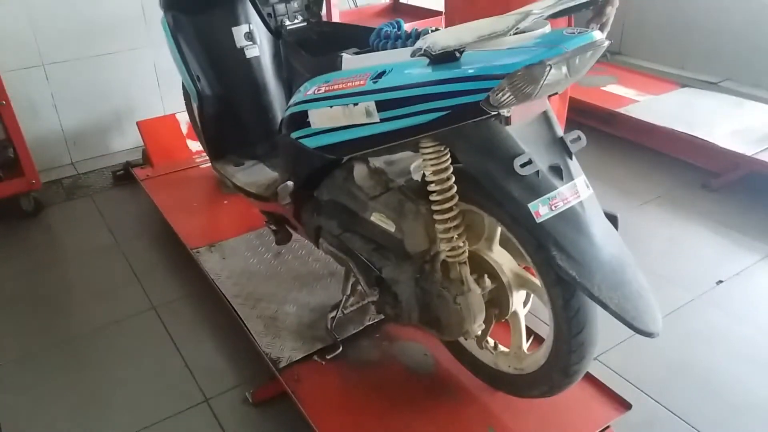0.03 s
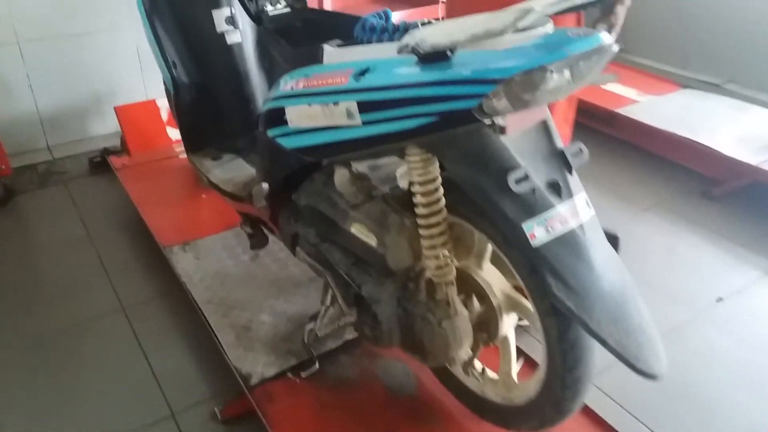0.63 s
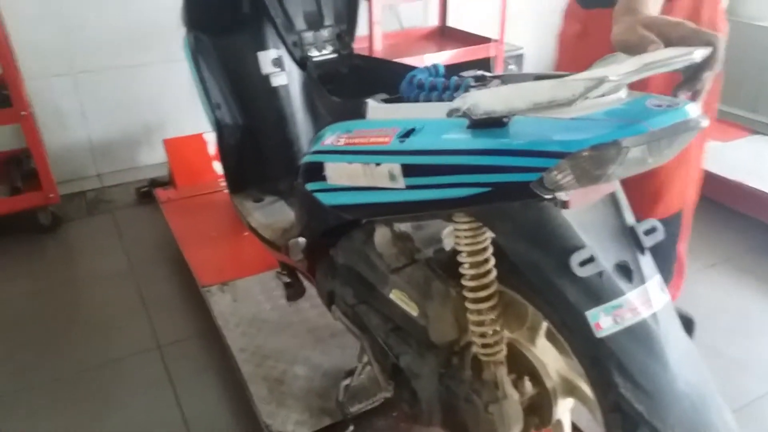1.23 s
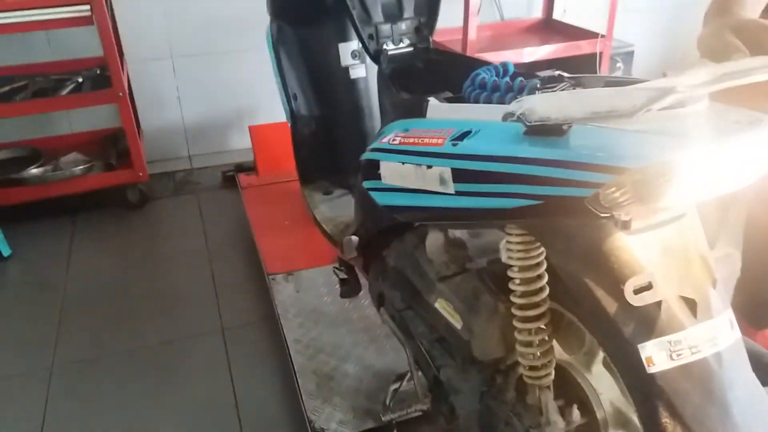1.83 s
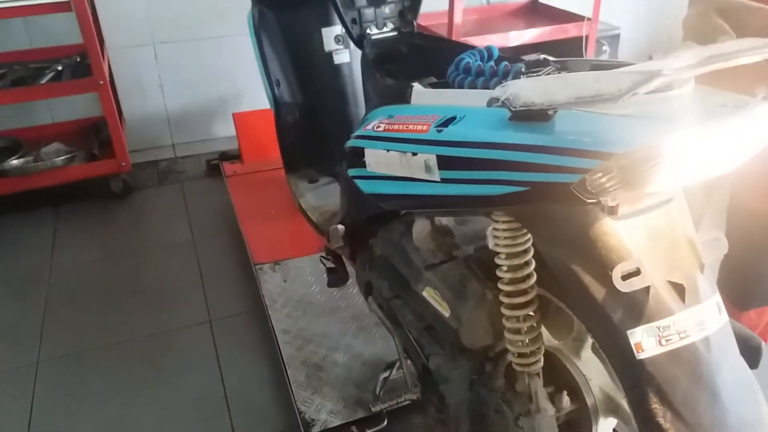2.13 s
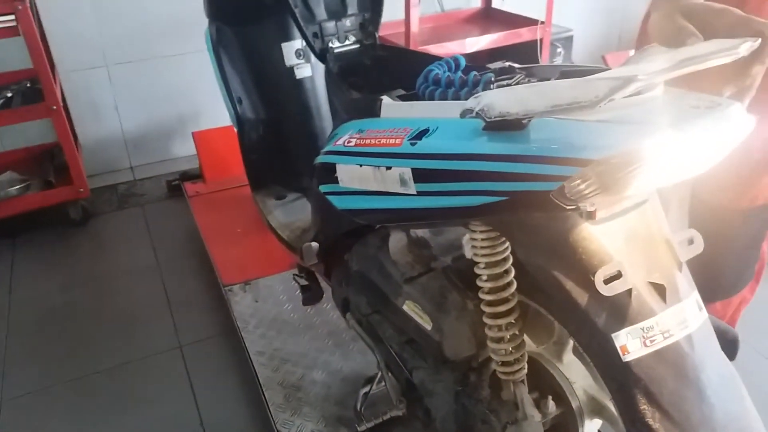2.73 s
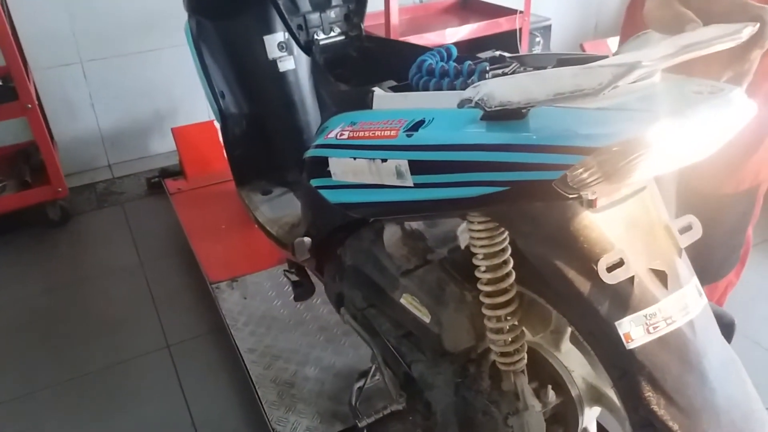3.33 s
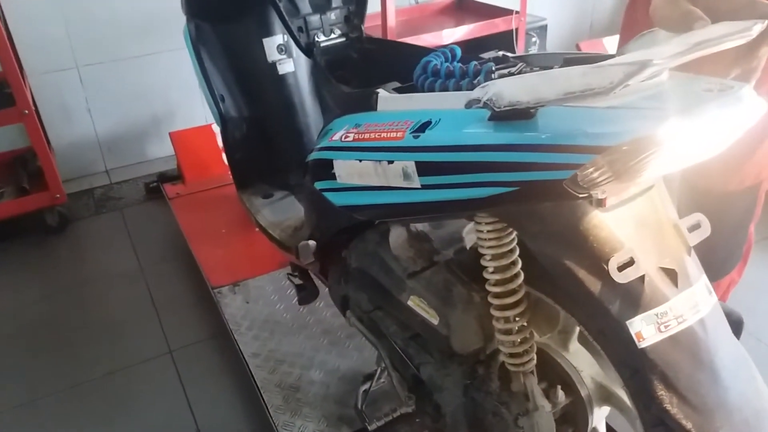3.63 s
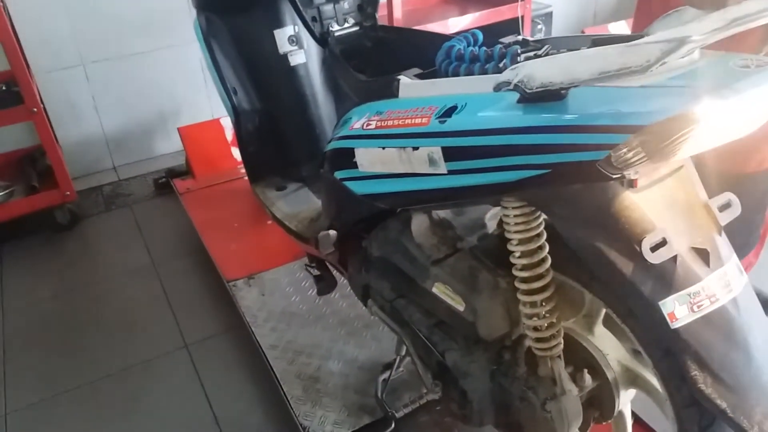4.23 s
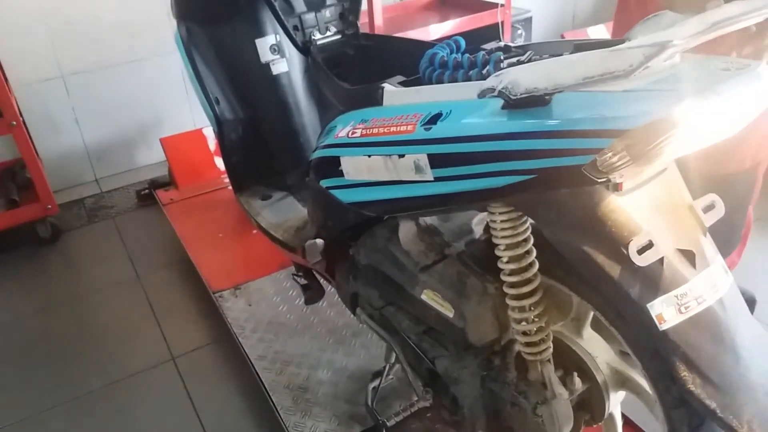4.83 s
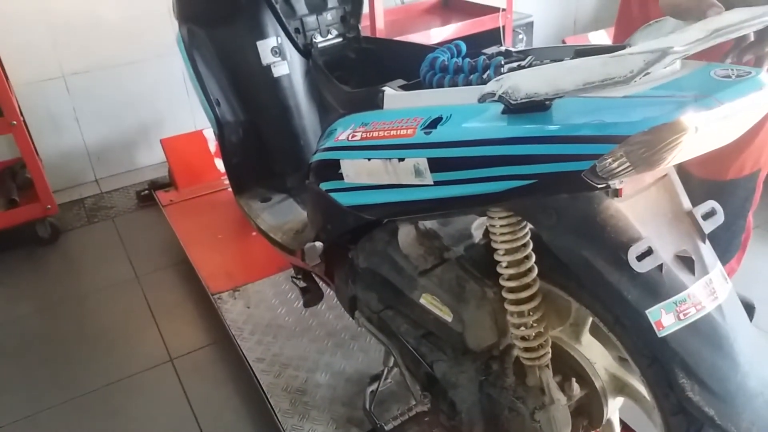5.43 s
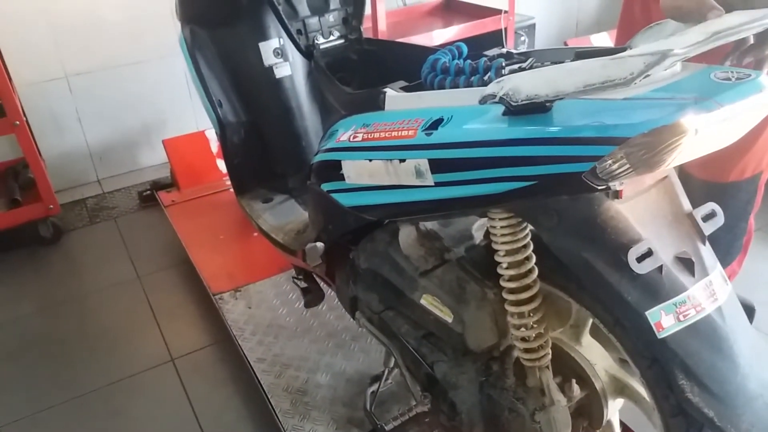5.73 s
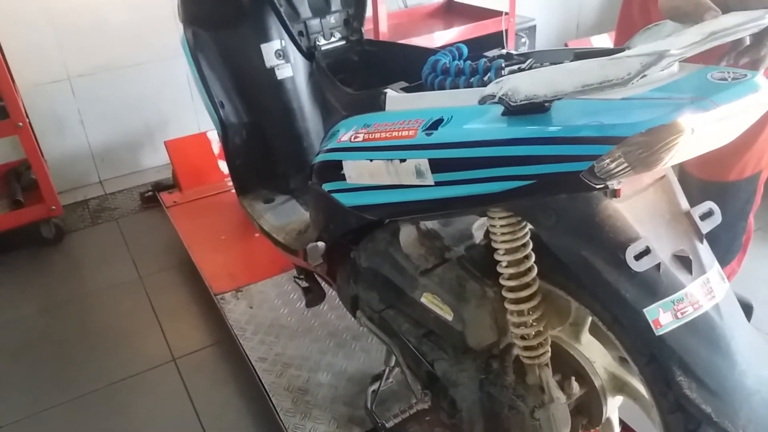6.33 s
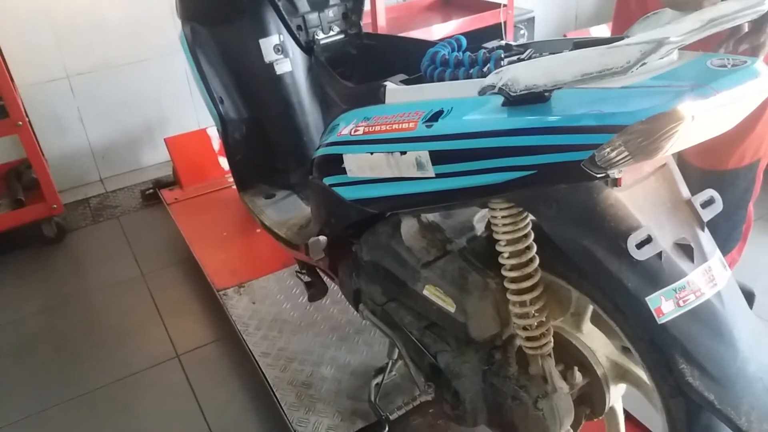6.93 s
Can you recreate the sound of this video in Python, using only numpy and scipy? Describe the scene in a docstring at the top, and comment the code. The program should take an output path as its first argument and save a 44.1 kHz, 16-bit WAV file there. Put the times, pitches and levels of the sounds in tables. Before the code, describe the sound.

For the first four seconds a tiled workshop is quiet, with a low rumble and fading hiss. Light rustles and small clicks on hollow bodywork come between 0.3 and 1.8 seconds, with a soft bump at 1.5 and a distant scrape at 2.5. Very faint, thin wavering tones follow until about 4. At 4 seconds an electric starter whines and whirrs for half a second, with several metallic clanks. The single-cylinder scooter engine catches at about 4.2, close by and much louder than the room, its slow hollow putts quickening until 5.7. It then settles to a pulsing idle with rushing exhaust, valve ticks and drive rattle. At 6.8 the throttle opens: an intake growl rises into a loud, buzzing rasp, with two sharp cracks just after 7 seconds as the sound ends. The walls add short echoes and a diffuse tail.

```python
"""A single-cylinder scooter engine starts, idles with a hollow putter and is revved to a loud rasp.
Each firing rings the silencer; gas rush, valve ticks and drive rattle follow the crank.
First come room tone, quiet handling clicks and the electric starter's gear whine and brush whirr.
Metallic clanks sound while the starter cranks, and two sharp cracks during the rev.
The tiled workshop adds wall echoes and a diffuse tail."""
import sys
import numpy as np
from scipy import signal
from scipy.fft import rfft, irfft, next_fast_len
from scipy.io import wavfile

SR = 44100
rng = np.random.default_rng(int(sys.argv[2]) if len(sys.argv) > 2 else 0)


def wav_out(sig):
    """Save sig, one row per channel (or a flat mono array), as 16-bit PCM at SR to the path in sys.argv[1]."""
    wavfile.write(sys.argv[1], SR, np.round(np.clip(np.atleast_2d(sig).T, -1, 1) * 32767).astype(np.int16))


N = 316638
TIME = np.arange(N) / SR

# Engine speed. Each row: time in seconds, firings per second.
FIRING_RATE = [(4.17, 4.78), (4.42, 6.55), (4.7, 9.39), (4.8, 10.08), (5.02, 13.65), (5.35, 16.91),
               (5.65, 18.13), (5.95, 15.25), (6.15, 14.02), (6.45, 13.53), (6.78, 13.88), (6.95, 22.35),
               (7.18, 33.45)]
CATCH_S = FIRING_RATE[0][0]


def from_db(db):
    """Decibels to gain."""
    return 10 ** (np.asarray(db) / 20)


def unit_rms(x):
    """Scale to rms 1."""
    return x / np.sqrt(np.mean(x ** 2) + 1e-20)


def curve(rows):
    """Interpolate (seconds, value) rows at every sample."""
    return np.interp(TIME, *np.transpose(rows))


def drift(rate_hz):
    """Straight lines between unit normal draws."""
    knots = rng.standard_normal(4000)
    return np.interp(TIME * rate_hz, np.arange(len(knots)), knots)


def swell(start_s, attack_s, hold_s, fade_db_per_s):
    """Envelope: linear rise, hold, exponential fade (growth if negative)."""
    age_s = TIME - start_s
    fade_db = fade_db_per_s * np.maximum(age_s - attack_s - hold_s, 0)
    return np.clip(age_s / attack_s, 0, 1) * from_db(-fade_db)


def band(x, low_hz, high_hz, order=2):
    """Causal band-pass."""
    edges_hz = np.clip([low_hz, max(high_hz, low_hz * 1.1)], 10, [.4 * SR, .45 * SR])
    return signal.sosfilt(signal.butter(order, edges_hz, "band", fs=SR, output="sos"), x + 1e-18)


def noise(spectrum, envelope=1):
    """Modulated white noise shaped by (Hz, dB) rows, rolled off beyond them; rms 1."""
    hz, db = np.transpose(spectrum)
    size = next_fast_len(N)
    log_hz = np.log(np.maximum(np.fft.rfftfreq(size, 1 / SR), 1))
    outside = np.maximum(np.log(hz[0]) - log_hz, 0) + np.maximum(log_hz - np.log(hz[-1]), 0)
    gain = from_db(np.interp(log_hz, np.log(hz), db) - 47 * outside)
    white = rng.standard_normal(N) * envelope
    return unit_rms(irfft(rfft(white, size) * gain, size)[:N])


def strikes(rows):
    """One band-limited noise burst per row."""
    out = np.zeros(N + SR)
    for start_s, db, low_hz, high_hz, length_s in rows:
        age = TIME[:SR // 4] / max(length_s, .001)
        burst = rng.standard_normal(len(age)) * np.sqrt(2 * np.e * age) * np.exp(-age ** 1.25)
        hit = band(burst, low_hz, high_hz, order=3) * np.sqrt(SR / 2 / abs(high_hz - low_hz))
        at = round(start_s * SR)
        out[at:at + len(hit)] += from_db(db) * hit
    return out[:N]


def ring(x, modes):
    """Drive damped modes with x and sum them."""
    out = np.zeros(N)
    for hz, db, t60_s in modes:
        r, w = from_db(-60 / (t60_s * SR)), 2 * np.pi * hz / SR
        out += from_db(db) * signal.lfilter([0, np.sin(w)], [1, -2 * r * np.cos(w), r * r], x + 1e-18)
    return out


def workshop(x, wet_db, t60_s):
    """Add the diffuse tail of the tiled room."""
    age_s = TIME[:SR]
    tail = rng.standard_normal(SR) * from_db(-60 * age_s / t60_s) * (age_s > .006)
    return x + from_db(wet_db) * signal.fftconvolve(x, tail / np.linalg.norm(tail))[:N]


def room_tone():
    """A slowly sinking rumble under a hiss that fades fast, then slowly."""
    # Spectra. Each row: frequency in Hz, relative density in dB.
    rumble_spectrum = [(21, -51), (35, -17.5), (88, -1.5), (125, -4.5), (231, -3.5), (269, -10), (338, -9),
                       (593, -14.5), (963, -19.5), (2600, -25), (2880, -25.5), (3270, -28), (7400, -38),
                       (15500, -44.5)]
    hiss_spectrum = [(180, -26), (300, 1), (390, -7), (499, -6.5), (831, -5.5), (1150, -8), (1490, -3.5),
                     (4540, -9.5), (9090, -29), (12000, -66), (15600, -71), (22000, -120)]
    hiss = np.hypot(from_db(-37 - 44 * TIME), from_db(-46.5 - 6.5 * TIME)) * noise(hiss_spectrum)
    return from_db(-44.5 - 0.79 * TIME) * noise(rumble_spectrum) + hiss


def rustles(floor_db):
    """Light rustles rise out of a flickering treble floor."""
    # Each row: start in seconds, hold in seconds, level in dB.
    events = [(.3, 0.27, -58), (.97, 0.79, -53.5), (2.854, 0.21, -58.5)]
    # Each row: frequency in Hz, relative density in dB.
    spectrum = [(1470, -23), (2500, -8), (3250, -8), (4280, 1), (4600, -10), (5210, -8.5), (12000, -51),
                (15600, -61), (22000, -120)]
    envelope = sum(from_db(db) * swell(start_s, 0.042, hold_s, fade_db_per_s=57)
                   for start_s, hold_s, db in events)
    return np.hypot(envelope, from_db(floor_db)) * from_db(2 * drift(39.43)) * noise(spectrum)


def handling(click_db, ring_db, bump_db, scrape_db):
    """Light clicks ring the hollow bodywork; a soft bump and a distant scrape follow."""
    # Each row: start in seconds, relative level in dB, low and high edge in Hz, length in seconds.
    contacts = [(0.325, -32.5, 350, 6360, 0.011), (0.616, -34, 3460, 7050, 0.003),
                (0.631, -40, 3600, 6800, 0.0084), (.726, -41, 353, 1510, 0.0083),
                (.88, -65.5, 8300, 9400, 0.075), (1.33, -55.5, 3970, 8200, 0.096),
                (1.383, -46.5, 1200, 2600, 0.0095)]
    # Each row: frequency in Hz, relative gain in dB, T60 in seconds.
    bodywork_modes = [(443, 8, 0.14), (1100, 2, 0.065), (1730, 1, 0.098), (3150, -7, .1), (3960, -10, 0.12)]
    # Each row: frequency in Hz, relative density in dB.
    scrape_spectrum = [(500, -22), (1000, -3.5), (1600, -5.5), (2050, -3), (2350, 2), (2800, -4),
                       (3200, -8.5), (4300, -6.5), (5500, -15.5), (8500, -21.5), (12000, -46)]
    taps = strikes(contacts)
    clicks = from_db(click_db) * taps + from_db(ring_db) * ring(taps, bodywork_modes)
    bump = unit_rms(band(rng.standard_normal(N), 68, 150))
    bump *= swell(1.5, attack_s=0.035, hold_s=.005, fade_db_per_s=260)
    scrape = from_db(1.2 * drift(80)) * noise(scrape_spectrum)
    scrape *= swell(2.485, attack_s=0.021, hold_s=0.037, fade_db_per_s=26)
    return workshop(clicks, wet_db=-3, t60_s=1) + from_db(bump_db) * bump + from_db(scrape_db) * scrape


def whistles():
    """Faint, thin, wavering tones."""
    # Each row: start in seconds, hold in seconds, frequency in Hz, level in dB.
    tones = [(2.25, .15, 3020, -63), (2.72, .6, 7440, -70), (3.0, 0.17, 2940, -60), (3.6, 0.3, 2940, -64)]
    out = np.zeros(N)
    for start_s, hold_s, hz, db in tones:
        envelope = from_db(db + 2 * drift(18)) * swell(start_s, .08, hold_s, fade_db_per_s=200)
        out += envelope * np.sin(2 * np.pi * hz * TIME + drift(110))
    return out


def panels(x):
    """Engine covers and panels colour x with narrow resonances; rms 1."""
    # Each row: centre in Hz, width in Hz, boost or cut in dB.
    resonances = [(298.2, 22, 3.5), (355.6, 8.6, 8), (514, 4, 0), (654, 24, 6.5), (1190, 70, -5.5),
                  (1380, 19, 2.5), (1857, 24, 3), (2250, 390, 4), (3860, 68, 3), (4260, 90, 5),
                  (4120, 30, -2), (4930, 93, 7.5), (5200, 130, 8), (5770, 90, 9), (6860, 170, 3)]
    peaks = ((from_db(db) - 1) * signal.lfilter(*signal.iirpeak(hz, hz / width_hz, fs=SR), x)
             for hz, width_hz, db in resonances)
    return unit_rms(x + sum(peaks))


def starter(whine_db, whirr_db):
    """Gear teeth whine at motor speed, grinding near the stall, over the rough whirr of the brushes."""
    # Spin-up, near stall, compression sags, coast. Each row: time in seconds, gear mesh rate in Hz.
    mesh_rate = [(4.02, 350), (4.06, 690), (4.068, 1235), (4.085, 1260), (4.12, 800), (4.15, 825),
                 (4.19, 1150), (4.215, 1225), (4.25, 1300), (4.3, 1330), (4.32, 1070), (4.37, 1235),
                 (4.41, 1315), (4.462, 1375), (4.48, 1220), (4.575, 1000), (4.745, 667), (4.95, 400)]
    # Armature hum and gear tones. Each row: multiple of the mesh rate, relative level in dB.
    partials = [(.2, -14.5), (1, -4), (2, -27), (3, -12.5), (4, -6), (6, -10), (8, -34), (10, -25),
                (14, -26), (16, -25)]
    # Radiation of the housing. Each row: frequency in Hz, gain in dB.
    housing_response = [(2400, -5), (2800, 2.5), (3400, -3), (3850, 12), (4400, -9), (4900, 12),
                        (5150, -3.5), (5500, -3), (7150, -5), (7480, 2), (8000, -13.5), (11200, 4),
                        (13200, -7.5), (15000, -30)]
    # Each row: time in seconds, relative level in dB.
    whine_contour = [(4.02, -2), (4.06, -6), (4.075, 8), (4.1, 9), (4.125, 3), (4.15, -7), (4.18, -19),
                     (4.215, 0), (4.33, 1), (4.37, 0), (4.46, 2.5), (4.485, -9), (4.59, -3.5), (4.75, -15),
                     (4.95, -22)]
    # Each row: frequency in Hz, relative density in dB.
    brush_spectrum = [(200, -2), (330, -2.5), (565, -8.5), (821, 2), (1050, -3.5), (1400, -2), (1970, -7),
                      (2350, -0.5), (3070, -8.5), (3900, -5), (4960, -15.5), (5500, -14.5), (7600, -17),
                      (9250, -37.5), (11300, -29.5), (15500, -49)]
    on_s, stall_s, off_s = 4.02, 4.105, 4.48
    mesh_hz = curve(mesh_rate)
    grinding = swell(stall_s, attack_s=0.0094, hold_s=0.017, fade_db_per_s=296)
    flutter = (0.00517 + 0.033 * grinding) * drift(900)
    phase = 2 * np.pi * np.cumsum(mesh_hz * (1 + flutter)) / SR
    strain = swell(on_s, attack_s=.02, hold_s=0.062, fade_db_per_s=500)  # first load dulls high tones
    whine = np.zeros(N)
    for multiple, db in partials:
        housing_db = np.interp(multiple * mesh_hz, *np.transpose(housing_response))
        partial_db = db + housing_db + 3 * drift(120) - 1.3 * multiple * strain
        whine += from_db(partial_db) * np.sin(multiple * phase)
    turning = (TIME >= on_s) & (TIME < mesh_rate[-1][0])
    whine *= turning * from_db(whine_db + curve(whine_contour))
    brushes = panels(noise(brush_spectrum, from_db(2.5 * drift(300))))
    running = swell(on_s, attack_s=0.041, hold_s=off_s - on_s, fade_db_per_s=20.5)
    whirr = brushes * running * from_db(whirr_db + 2 * grinding)
    return workshop(whine, wet_db=-18, t60_s=0.8) + whirr


def clanks_and_cracks(ring_db, crack_db):
    """Metallic clanks while the starter cranks, and two sharp cracks during the rev."""
    # Each row: start in seconds, relative level in dB, low and high edge in Hz, length in seconds.
    events = [(4.02, -26.5, 503, 10600, 0.0066), (4.092, -9.5, 2710, 3900, 0.015),
              (4.109, -3.5, 766, 1050, 0.011), (4.11, -18, 1190, 4340, 0.012),
              (4.146, -6, 4700, 5200, 0.0053), (4.252, -9, 3330, 5800, 0.0094),
              (4.305, -1.5, 1220, 5200, 0.0097), (4.306, -15.5, 642, 770, 0.0077),
              (4.466, -1, 1310, 5440, 0.0078), (7.021, -1.5, 1500, 7050, 0.0037),
              (7.131, 2.5, 2970, 6400, 0.0057)]
    # Each row: frequency in Hz, relative gain in dB, T60 in seconds.
    crankcase_modes = [(696, 0, 0.094), (1402, 6.5, 0.048), (2400, 3.5, 0.12), (2377, 3, 0.043),
                       (2854, -7.5, 0.11), (3556, -13, 0.092), (3700, -2, 0.12), (4810, 7, 0.031),
                       (6640, 4.5, 0.025)]
    bursts = strikes(events)
    ringing = from_db(ring_db) * ring(bursts, crankcase_modes)
    return workshop(ringing + from_db(crack_db) * bursts, wet_db=-7.5, t60_s=1)


def engine_state(idle_hz):
    """Cycles since the catch, speed in octaves above idle, firing effort in dB."""
    # Catch, flare, settle, rev. Each row: time in seconds, effort in dB above idle.
    effort = [(4.17, -11.5), (4.36, -2.5), (4.5, 2.5), (4.63, 4), (5.35, 4), (5.9, 4), (6.3, 1), (6.76, 0),
              (6.84, 6), (6.98, 6), (7.06, 0.5)]
    firing_hz = curve(FIRING_RATE)
    cycles = np.cumsum(firing_hz * (TIME >= CATCH_S)) / SR
    return cycles, np.log2(firing_hz / idle_hz), curve(effort)


def stroke(cycles, centre, width):
    """A Gaussian window once per engine cycle; centre and width in cycles."""
    return np.exp(-.5 * (((cycles - centre + .5) % 1 - .5) / width) ** 2)


def exhaust(cycles, octaves, effort_db, level_db, uneven_db, detune, rise_s):
    """Each firing rings the silencer with a putt, hollower the harder it is; close walls repeat it."""
    # Each row: idle frequency in Hz, relative level in dB, T60 in seconds, dB per dB of extra effort.
    silencer_modes = [(84, -14, 0.11, -0.4), (117, -9, 0.085, 0.4), (151, -12.5, 0.097, 1.65),
                      (301, -29, 0.057, 1.4), (429, -30, 0.11, 0.2)]
    # Each row: echo delay in seconds, gain in dB.
    walls = [(0.0124, -4.5), (0.0255, -11.5), (0.038, -15)]
    hz, mode_db, t60_s, growth = np.transpose(silencer_modes)[:, :, None]
    heat_ratio = 1 + 0.08 * octaves + 0.002 * effort_db  # hotter gas rings higher
    firings = np.flatnonzero(np.diff(np.ceil(cycles)) > 0)
    out, age_s = np.zeros(N + SR), TIME[:SR // 5]
    for at in firings:
        force_db = min(effort_db[at], 0) + growth * max(effort_db[at], 0)
        force_db += uneven_db * rng.standard_normal()
        mode_hz = hz * heat_ratio[at] * (1 + detune * rng.standard_normal(hz.shape))
        decay = from_db(mode_db + force_db - 60 * age_s / t60_s)
        putt = (decay * np.sin(2 * np.pi * mode_hz * age_s)).sum(axis=0)
        out[at:at + len(age_s)] += from_db(level_db) * putt * (1 - np.exp(-age_s / rise_s))
    direct = out[:N]
    echoes = sum(from_db(db) * np.interp(TIME - delay_s, TIME, direct) for delay_s, db in walls)
    return workshop(band(direct + echoes, 82.6, 1100, order=4), wet_db=-11, t60_s=.5)


def gas_rush(cycles, octaves, effort_db, idle_db):
    """Gas rushes out, slightly stronger after each firing."""
    # Each row: frequency in Hz, relative density in dB.
    spectrum = [(140, -36), (230, -1.5), (301, 0.5), (340, -10.5), (419, 2.5), (505, -8), (734, -13),
                (822, -2.5), (1160, -7.5), (1600, -14.5), (2080, -22), (3520, -120)]
    gain = (TIME >= CATCH_S) * from_db(idle_db + 6 * octaves + 0.1 * effort_db)
    return gain * panels(noise(spectrum, 1 + 0.093 * stroke(cycles, 0.043, 0.34)))


def drive_rattle(cycles):
    """Chain and belt rattle, pulsing once a cycle."""
    # Each row: frequency in Hz, relative density in dB.
    spectrum = [(760, -46), (1300, -4), (1550, -2.5), (2210, -2), (2550, -7.5), (3040, -8.5), (3740, -4),
                (4510, -9), (5110, -9), (5490, -14), (5970, -12), (8060, -24.5), (15500, -44.5)]
    contacts = (1 + 0.26 * stroke(cycles, 0.23, 0.16)) * from_db(1.5 * drift(350))
    return panels(noise(spectrum, contacts))


def valves(cycles, rocker_db):
    """A valve snaps shut once a cycle, followed by a lighter tap of the rocker."""
    taps = stroke(cycles, 0.306, 0.038) + from_db(rocker_db) * stroke(cycles, 0.66, 0.028)
    return taps * unit_rms(band(rng.standard_normal(N), 3700, 5360))


def intake(cycles, open_s, level_db):
    """With the throttle open, each stroke draws a growl through the air box, growing louder."""
    air = rng.standard_normal(N) * (1 + 0.89 * stroke(cycles, 0.23, 0.14))
    envelope = swell(open_s, attack_s=0.041, hold_s=0, fade_db_per_s=-10)
    return from_db(level_db) * envelope * panels(band(air, 216, 603, order=3))


def rev_rasp(cycles, full_db, full_firing_hz, db_per_octave, singing_db):
    """At high speed each stroke rasps, panels buzz and, last of all, steel drive parts sing."""
    # Each row: frequency in Hz, relative density in dB.
    spectrum = [(200, 0), (330, 6.5), (500, -8.5), (800, -1.5), (1300, -5.5), (1900, 3), (2300, -4),
                (2800, -3.5), (3400, -6.5), (4000, 1.5), (4500, 2.5), (5000, -9.5), (6400, -5), (7500, -15),
                (9000, -19), (11000, -21.5), (15500, -37)]
    # Each row: frequency in Hz, relative level in dB.
    steel_tones = [(5469, -47), (5642, -34), (6578, -54), (8109, -41), (9771, -37.5), (13950, -61)]
    shaking = from_db(db_per_octave * np.minimum(np.log2(curve(FIRING_RATE) / full_firing_hz), 0))
    clatter = (1 + 0.36 * stroke(cycles, 0.37, 0.11)) * from_db(3.5 * drift(220))
    rasp = panels(noise(spectrum, clatter))
    singing = np.zeros(N)
    for hz, db in steel_tones:
        gain = from_db(db + singing_db + 3.3 * drift(30))
        singing += gain * np.sin(2 * np.pi * hz * TIME + 0.75 * drift(70))
    return from_db(full_db) * shaking * (rasp + shaking * singing)


def scene():
    """Workshop, starter and engine in mono."""
    mix = room_tone() + rustles(floor_db=-65)
    mix += handling(click_db=-1.5, ring_db=-42.5, bump_db=-30, scrape_db=-45.5)
    mix += whistles()
    mix += starter(whine_db=-29, whirr_db=-26)
    mix += clanks_and_cracks(ring_db=-51.5, crack_db=-15)
    cycles, octaves, effort_db = engine_state(idle_hz=14)
    mix += exhaust(cycles, octaves, effort_db, level_db=2, uneven_db=1.35, detune=0.045, rise_s=0.0054)
    mix += gas_rush(cycles, octaves, effort_db, idle_db=-30.5)
    mechanical_gain = (TIME >= CATCH_S) * from_db(-36.5 + 10 * octaves)
    mix += mechanical_gain * (drive_rattle(cycles) + valves(cycles, rocker_db=-4.5))
    mix += intake(cycles, open_s=6.83, level_db=-23)
    mix += rev_rasp(cycles, full_db=-15.5, full_firing_hz=25.85, db_per_octave=65, singing_db=18.5)
    return mix[None]


def record(dry):
    """Soft clip, then a steep low-pass at 15.7 kHz."""
    rounded = 1.216 * np.tanh(dry / 1.376)
    return signal.sosfilt(signal.ellip(10, .1, 90, 15700, fs=SR, output="sos"), rounded)


dry = scene()
out = record(dry)
wav_out(out)
```